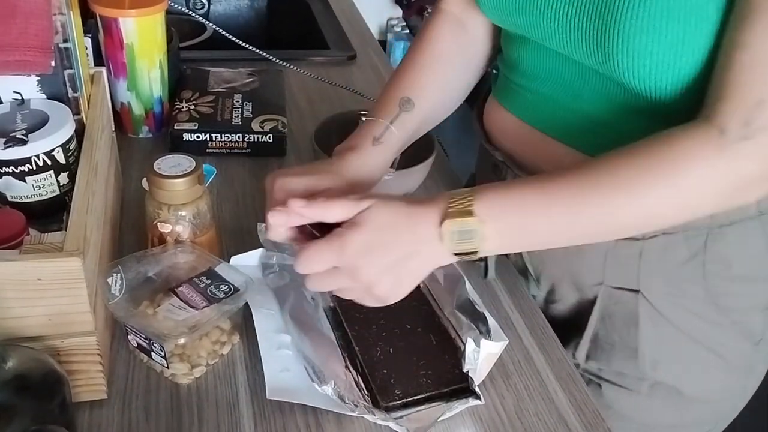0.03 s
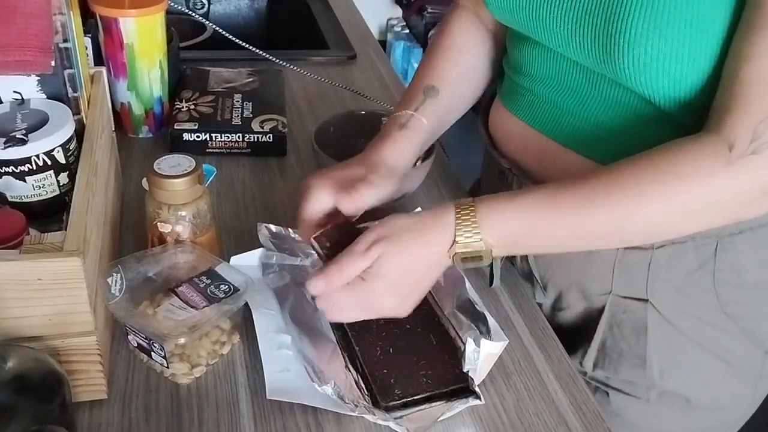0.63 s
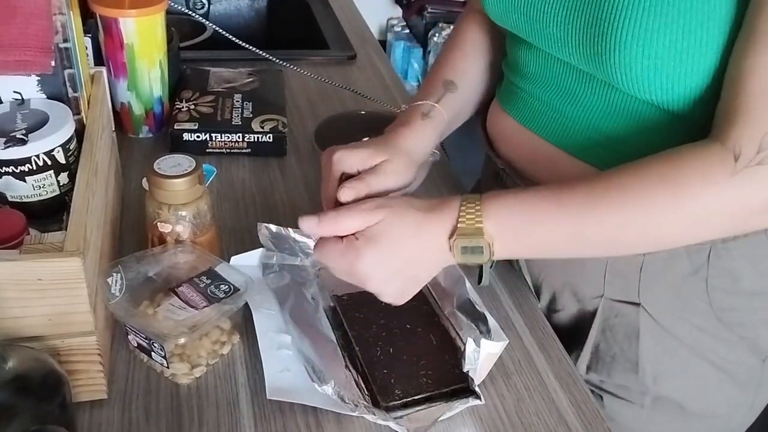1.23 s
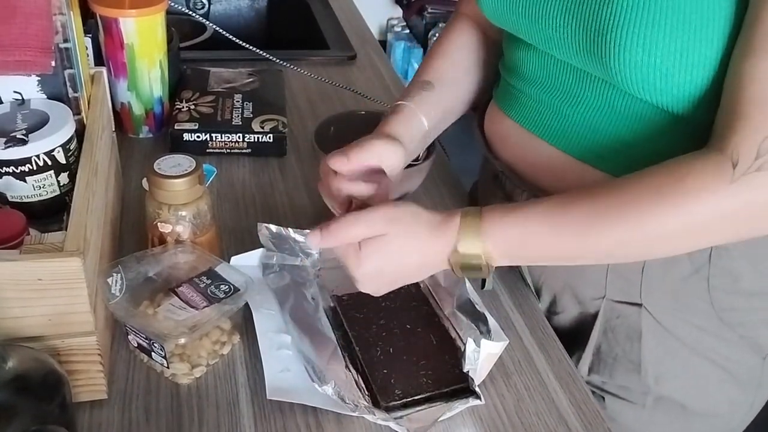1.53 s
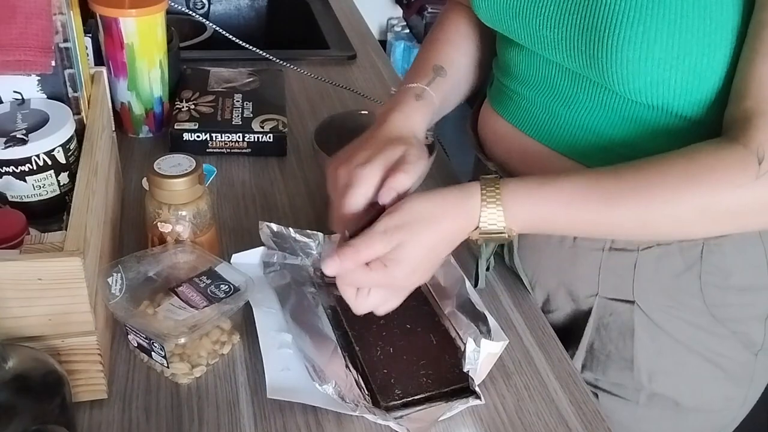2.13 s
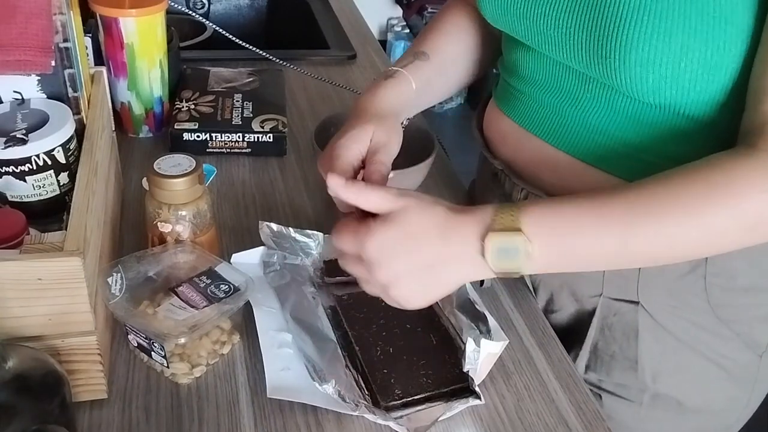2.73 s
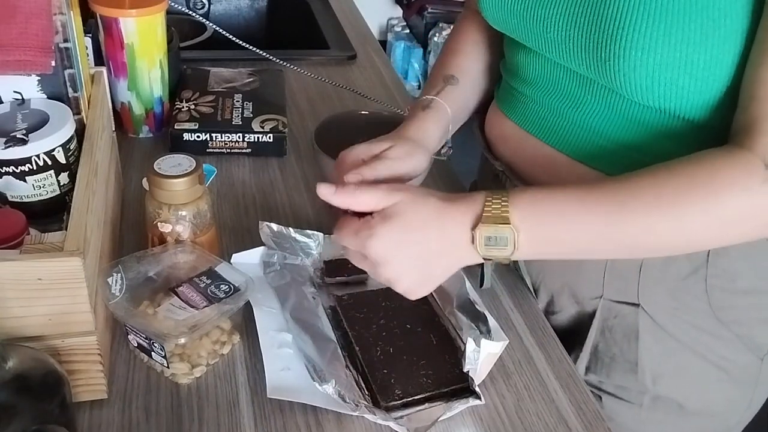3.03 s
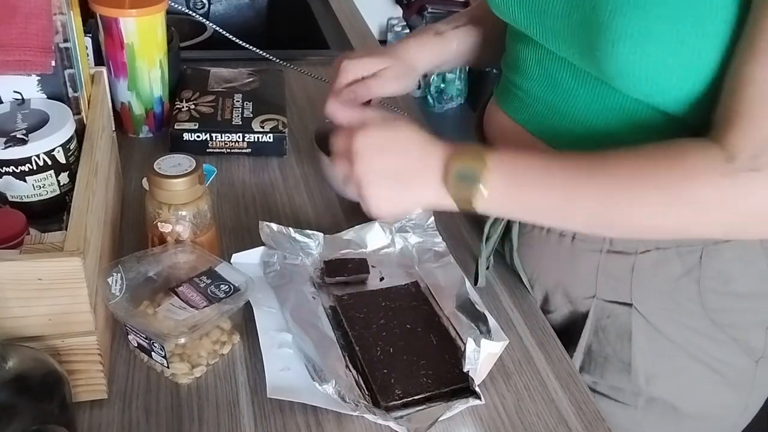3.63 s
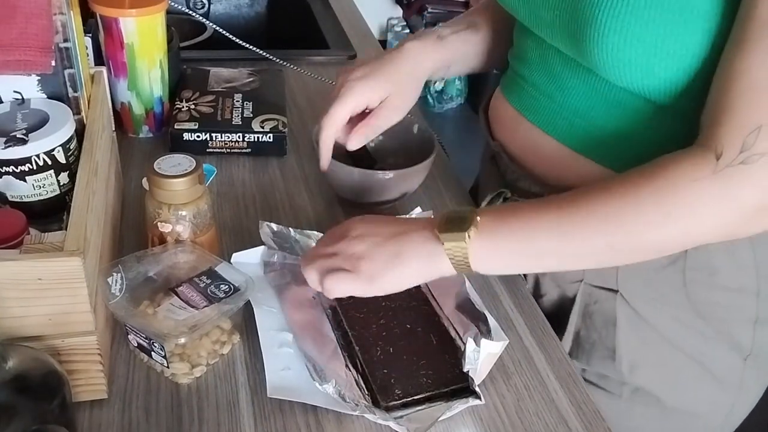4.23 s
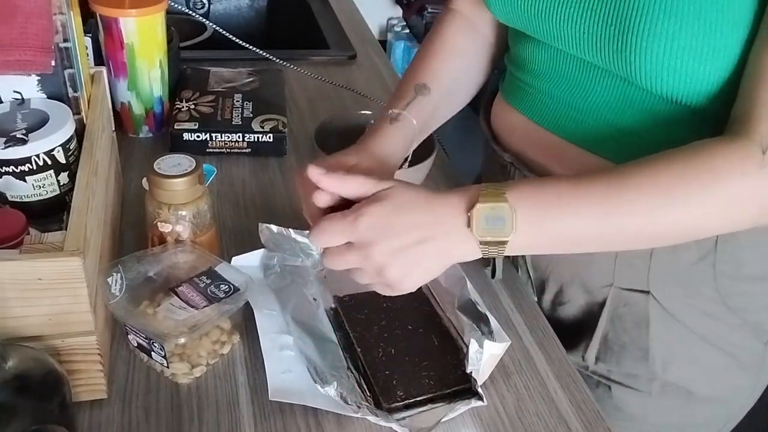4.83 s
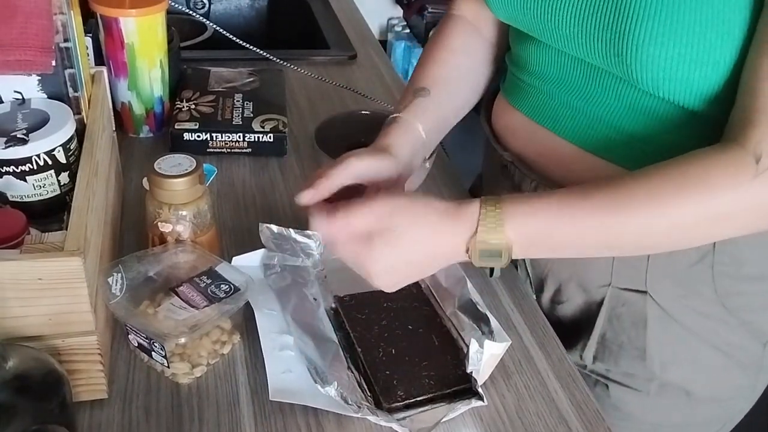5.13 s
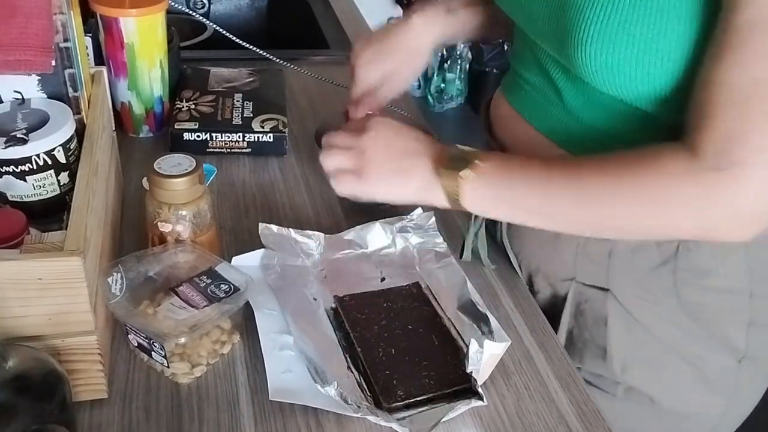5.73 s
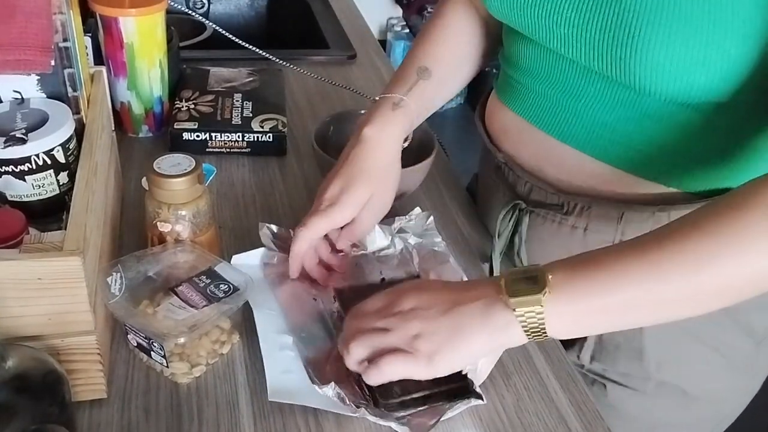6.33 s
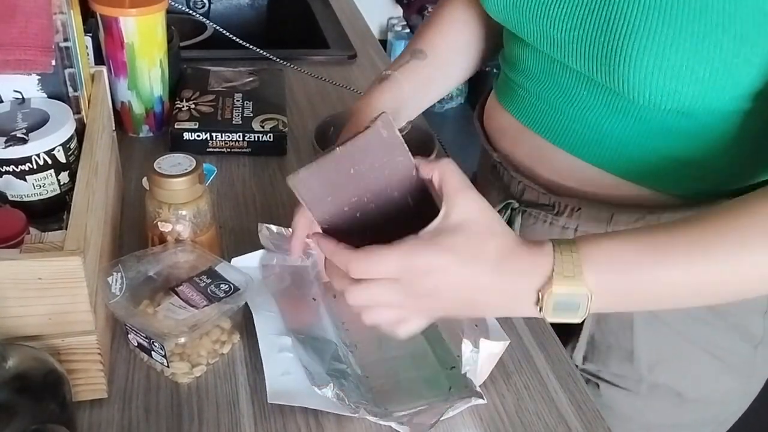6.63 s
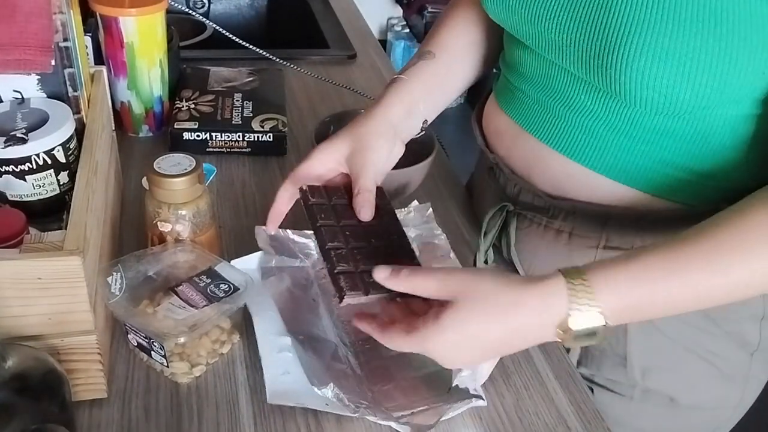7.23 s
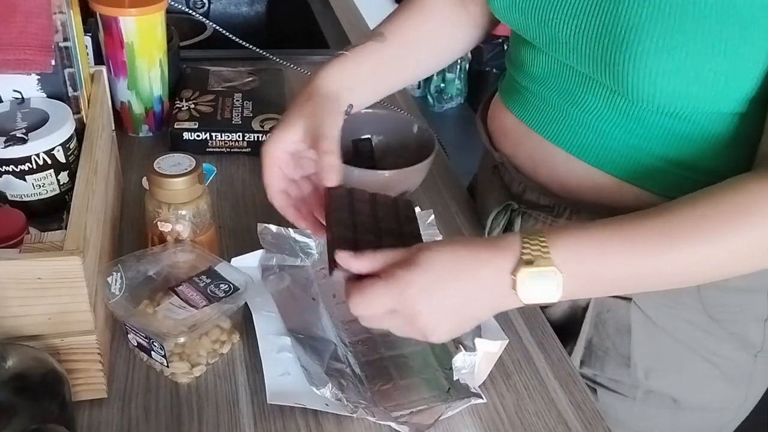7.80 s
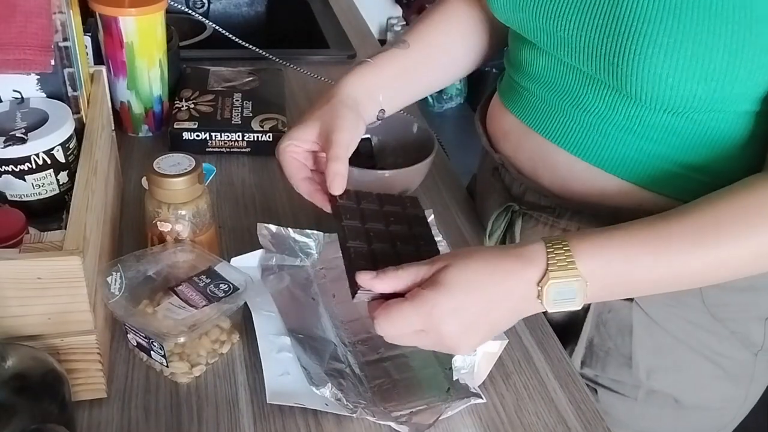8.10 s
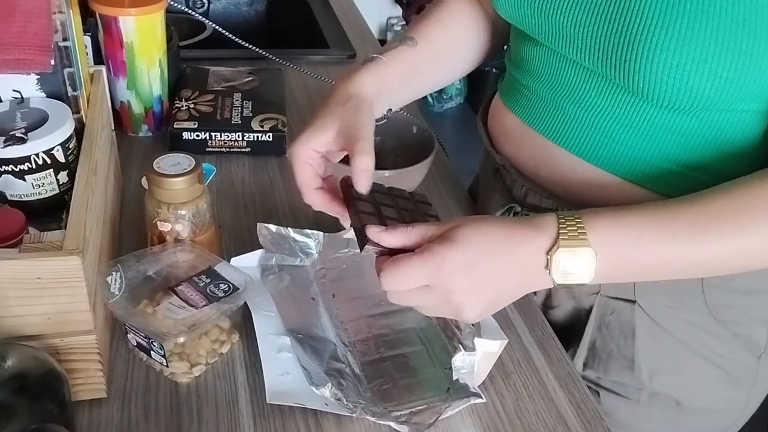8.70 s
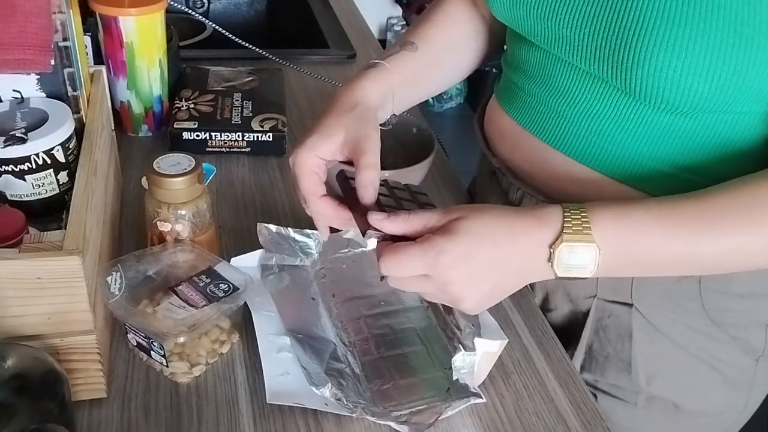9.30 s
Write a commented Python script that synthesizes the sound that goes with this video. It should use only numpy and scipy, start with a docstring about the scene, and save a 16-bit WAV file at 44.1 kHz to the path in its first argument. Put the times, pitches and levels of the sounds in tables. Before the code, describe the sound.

Hands crack chocolate and drop pieces into a ceramic bowl, with light foil rustles and dull knocks in a small kitchen.

```python
"""A chocolate bar cracks and crunches as hands break it over its open foil on a kitchen worktop.
Each crack, or click of a crumb, excites two resonances. Impacts of hands and pieces drive the low modes
of the worktop, and falling pieces ring a ceramic bowl. The foil crinkles by buckling; fingers and pieces
rub by stick-slip friction. A small live room reverberates, over faint air noise and an appliance's hum."""
import sys
import numpy as np
from scipy import signal
from scipy.fft import rfft, irfft
from scipy.io import wavfile

SR = 44100
rng = np.random.default_rng(int(sys.argv[2]) if len(sys.argv) > 2 else 0)


def file_out(sig):
    """Save sig as 16-bit WAV at sys.argv[1]."""
    # one column per channel
    cols = np.atleast_2d(sig).T
    # limit, then scale
    lim = np.clip(cols, -1, 1)
    pcm = np.round(lim * 32767).astype(np.int16)
    wavfile.write(sys.argv[1], SR, pcm)


N = 417186
TIME = np.arange(N) / SR
AGE = TIME[:SR // 2]  # time since an impact
TOP_HZ = 16100


# A piece cracks or crunches, or a crumb clicks as it lands:
# t/s, level/dB, main resonance f/Hz, its gain/dB, second resonance f/Hz, upper cutoff f/Hz
CRACKS_AND_CLICKS = [(.1915, -9.5, 694, 13.5, 1950, 1215), (1.5812, -11, 1783, 6.5, 5300, 6850),
                     (1.8986, -18.5, 470, 24, 850, 5000), (1.915, -15, 465, 13, 1420, 3500),
                     (2.0587, -14, 2500, 7, 860, 5000), (2.1095, -21.5, 2500, -8, 3400, 6500),
                     (2.599, -33, 480, 25.5, 1157, 1450), (3.2962, -19.5, 1684, 12, 2230, 5800),
                     (3.471, -26, 700, 10.5, 450, 800), (4.009, -28, 780, 13, 530, 1470),
                     (5.2187, -20.5, 2175, 8.5, 1370, 7200), (5.821, -29, 4060, -6, 6100, 7000)]


def cracks_and_clicks(width_hz=45, damping=0.068, second_db=4, low_hz=190, cycles=13, longest_s=0.0075):
    """Transient excitation: a crack or click rings two resonances; the slower the burst, the duller."""
    out = np.zeros(N)
    for s, db, main_hz, main_db, second_hz, cutoff_hz in CRACKS_AND_CLICKS:
        rise_s = min(cycles / cutoff_hz, longest_s)
        pulse = bandpass(burst(rise_s), low_hz, cutoff_hz)
        main, second = (resonance(pulse, hz, width_hz + damping * hz) for hz in (main_hz, second_hz))
        add(out, s, amp(db) * peak(pulse + amp(main_db) * main + amp(second_db) * second))
    return out


# Impacts on the worktop: t/s, level/dB, relative clack level/dB
WORKTOP_IMPACTS = [(0.778, -33.5, -16), (0.961, -33, -18.5), (1.849, -33, -31), (2.099, -22, -38),
                   (2.198, -31, -24), (2.751, -38.5, -10), (3.007, -26, -17.5), (3.218, -29, -20),
                   (3.318, -25.5, -20.5), (3.41, -32, -21), (3.501, -27, -9.5), (4.005, -24, -10),
                   (4.145, -30, -36), (4.225, -13.5, -15.5), (5.147, -44.5, -13.5), (5.508, -35, -31),
                   (8.013, -19, -18.5), (8.298, -40.5, -23.5), (8.485, -37, -23.5), (8.972, -32.5, -26),
                   (9.192, -43, -26)]
# Modes of the worktop: f/Hz, level/dB, T60/s
WORKTOP_MODES = [(46.4, -2.5, 0.21), (118.7, -11, 0.043), (145.54, 9, 0.24), (173, 6.5, 0.15),
                 (187.6, -4, 0.22), (244.3, -2.5, 0.096)]
# Spectrum of the contact: f/Hz, level/dB
CLACK_SPECTRUM = [(150, -15), (400, 0.5), (700, -8), (1100, -20.5), (2500, -31), (6000, -39), (15000, -40)]


def worktop_thuds(rise_s=0.0056, clack_s=0.0044, clack_db=-2):
    """Impact excitation: a soft blow sets the worktop's modes booming, and the contact radiates a clack."""
    booms, clacks = np.zeros(N), np.zeros(N)
    for s, db, contact_db in WORKTOP_IMPACTS:
        add(booms, s, -amp(db) * ring(WORKTOP_MODES, rise_s))
        clack = peak(colour(burst(clack_s), CLACK_SPECTRUM))
        add(clacks, s, amp(db + contact_db + clack_db) * clack)
    return booms, clacks


# Pieces landing in the bowl: t/s, level/dB, contact cutoff f/Hz
BOWL_IMPACTS = [(3.855, -30.5, 1510), (3.8981, -5.5, 10110), (5.715, -20.5, 1320), (5.7759, -20, 1630)]
# Modes of the bowl on the worktop: f/Hz, level/dB, T60/s
BOWL_MODES = [(155.3, -10, 0.21), (210, -7, 0.11), (411.3, -7, .06), (467.6, -2, 0.096), (672, 1, 0.03),
              (912, -14.5, 0.1002), (968, -2.5, 0.029), (1323, -14, 0.032), (2114, -17.5, .05),
              (3640, -24.5, 0.068), (5450, -20.5, .04), (6687, 3, 0.059), (6763, -7, 0.17),
              (6720, -12, 0.11), (7270, 1, .03), (7620, -22, 0.1), (8180, -15, 0.046), (9220, -6.5, 0.11),
              (10000, -15, 0.046)]


def bowl_clinks(chatter_s=.0025, chatter_db=-8, rise_s=0.000707, leak_db=-33):
    """Contact compliance is a low-pass: only a hard landing strongly excites the ceramic's high ping."""
    out = np.zeros(N)
    chatter_spectrum = [(900, 0), (2500, -6), (5000, -8), (7000, 0), (10000, -4)]  # f/Hz, level/dB
    for s, db, cutoff_hz in BOWL_IMPACTS:
        chatter = peak(colour(burst(chatter_s), chatter_spectrum))
        blow = ring(BOWL_MODES, rise_s) + amp(chatter_db) * chatter
        contact = signal.butter(5, cutoff_hz, fs=SR, output="sos")
        add(out, s, amp(db) * peak(signal.sosfilt(contact, blow) + amp(leak_db) * blow))
    return out


# A hand flexes the foil: onset t/s, hold/s, level/dB
FOIL_FLEXES = [(1.65, .11, -67), (1.97, 0.16, -50.5), (4.155, 0.31, -56.5), (4.38, 0.11, -57.5),
               (6.1, 0.12, -49), (6.175, 0.12, -50.5), (6.35, 0.34, -53.5), (6.9, .19, -53),
               (7.14, 0.12, -60), (7.26, 0.17, -55.5)]


def flex_envelope(attack_s=.02, release_s=0.034, sag_db_per_s=26):
    """Relaxation: the crackle of each flex starts quickly, eases as the sheet gives, then dies away."""
    gain = np.zeros(N)
    for s, hold_s, db in FOIL_FLEXES:
        age = np.maximum(TIME - s, 0)
        attack = np.minimum(age / attack_s, 1)
        release = np.exp(-np.maximum(age - hold_s, 0) / release_s)
        gain = np.maximum(gain, amp(db - sag_db_per_s * age) * attack * release)
    return gain


# Whole creases snapping through: t/s, level/dB
CREASE_SNAPS = [(0.0517, -51.5), (0.1037, -42), (0.714, -42.5), (0.9642, -42.5), (1.051, -34.5),
                (1.5798, -28.5), (1.855, -42.5), (1.9022, -24.5), (2.058, -28), (2.6508, -36), (3.49, -46),
                (3.8098, -41), (4.193, -45), (4.392, -37.5), (5.218, -40.5), (5.526, -42), (5.6255, -48),
                (6.0955, -34), (6.3015, -24), (6.599, -46), (6.8638, -42), (7.039, -39), (7.3948, -33),
                (7.7157, -51.5), (7.7607, -50.5)]
# Spectrum radiated by the foil: f/Hz, level/dB
FOIL_SPECTRUM = [(400, -13.5), (1000, -17), (2000, -11.5), (4500, -6), (6500, -4.5), (8500, -8.5),
                 (11000, -7), (13000, -1.5), (16000, -3)]


def foil_crinkle(pops_per_s=900, pop_s=.0012, crease_s=.0022, crumple_db=2, crease_db=2):
    """Buckling: facets of the flexed sheet pop with a tick and a ping; at times a whole crease flips."""
    starts = np.flatnonzero(rng.random(N - SR // 100) < pops_per_s / SR)
    age = AGE[:SR // 200]
    ping_hz = rng.uniform(1200, TOP_HZ, (len(starts), 1))
    ticks = rng.standard_normal((len(starts), len(age)))
    pops = (ticks + np.sin(2 * np.pi * ping_hz * age)) * np.exp(-age / pop_s)
    sizes = amp(5 * np.minimum(rng.exponential(size=(len(starts), 1)), 4))  # most are tiny, a few stand out
    samples = starts[:, None] + np.arange(len(age))
    crinkle = np.bincount(samples.ravel(), (sizes * pops).ravel(), N)
    clumps = amp(4 * wander(80))
    out = unit(colour(crinkle * clumps, FOIL_SPECTRUM)) * flex_envelope() * amp(crumple_db)
    for s, db in CREASE_SNAPS:
        add(out, s, amp(db + crease_db) * peak(colour(burst(crease_s), FOIL_SPECTRUM)))
    return out


# Fingertips brushing the bar: centre t/s, duration/s, level/dB
FINGER_STROKES = [(0.872, .38, -69), (1.5, 0.4, -71.5), (2.572, 0.5, -71), (3.009, 0.17, -58)]
# A hand or piece dragging, from rumble to squeak: centre t/s, duration/s, level/dB, judder f/Hz
JUDDERS = [(0.211, 0.1, -39, 137.7), (3.24, 0.067, -46, 400), (3.473, 0.45, -39, 46.5),
           (3.538, 0.073, -49.5, 611), (4.851, 0.059, -54, 362), (7.372, 0.064, -61, 1110),
           (7.495, 0.035, -66, 1120), (8.41, 0.22, -72.5, 2900)]


def rubbing(flicker_db=4.0, brush_band_hz=(1400, 7000), judder_ratio=1.22):
    """Stick-slip friction: uneven noise swells and fades, broadband in a brush, narrowband in a judder."""
    out = np.zeros(N)
    slips = rng.standard_normal(N) * amp(flicker_db * wander(70))
    rubs = [(*row, *brush_band_hz) for row in FINGER_STROKES]
    rubs += [(s, length, db, hz / judder_ratio, hz * judder_ratio) for s, length, db, hz in JUDDERS]
    for s, length, db, low_hz, high_hz in rubs:
        swell = np.cos(np.pi * np.clip((TIME - s) / length, -.5, .5))
        out += amp(db) * swell * unit(bandpass(slips, low_hz, high_hz))
    return out


# Spectrum of the room air: f/Hz, level/dB
AIR_SPECTRUM = [(25, -3.5), (45, -2), (110, -3.5), (200, -16.5), (350, -26), (600, -33), (1400, -43.5),
                (5000, -44.5), (10500, -53.5), (14000, -50.5)]


def room_air(db=-50):
    """Spatial coherence: ambient noise is nearly alike at both microphones in the bass, unlike above it."""
    mid, side = (unit(colour(rng.standard_normal(N), AIR_SPECTRUM)) for _ in range(2))
    side = colour(side, [(100, -13.5), (300, -8.0), (1000, 0.5)])
    return amp(db) * np.array([mid + side, mid - side])


# Partials of the appliance: f/Hz, level/dB
HUM_PARTIALS = [(42, -62.5), (81, -62), (286.5, -62.5)]


def appliance_hum():
    """Amplitude and phase modulation: each low partial wavers slightly at random."""
    return sum(np.sqrt(2) * amp(db + wander(7.6)) * np.sin(2 * np.pi * hz * TIME + wander(1.9) / 2)
               for hz, db in HUM_PARTIALS)


# Reverberation time of the kitchen: f/Hz, T60/s
KITCHEN_T60 = [(100, 0.65), (300, 0.67), (700, 0.5), (1900, 0.52), (5000, 0.55), (13000, 0.082)]


def room_response(build_s=0.0033, early_db=5, early_s=0.0056, low_hz=90):
    """Reverberation: strong early reflections lead into a diffuse tail that decays band by band."""
    t = TIME[:SR * 3 // 4]
    hz = np.fft.rfftfreq(len(t), 1 / SR)
    centres = np.geomspace(100, 15000, 9)
    noise = rfft(rng.standard_normal(len(t))) * hz ** 2 / (hz ** 2 + low_hz ** 2)  # small room: no deep bass
    tail = 0
    for centre, weights in zip(centres, np.eye(len(centres))):
        band = irfft(noise * curve_at(np.c_[centres, weights], hz), len(t))
        tail = tail + band * np.exp(-np.log(1000) * t / curve_at(KITCHEN_T60, centre))
    tail *= 1 - np.exp(-(t / build_s) ** 2)
    tail *= 1 + amp(early_db) * np.exp(-t / early_s)
    return tail / np.sqrt(np.sum(tail ** 2))


def amp(db):
    """Amplitude ratio of a level."""
    return 10 ** (np.asarray(db) / 20)


def unit(x):
    """Normalisation to unit rms."""
    return x / np.sqrt(np.mean(x ** 2))


def peak(x):
    """Normalisation to unit peak."""
    return x / np.abs(x).max()


def add(track, s, sound):
    """Superposition of a sound on a track at s seconds."""
    start = int(s * SR)
    track[start:start + len(sound)] += sound[:N - start]


def wander(rate_hz):
    """Random modulation of unit rms, by linear interpolation."""
    knots = rng.standard_normal(int(rate_hz * N / SR) + 2)
    return unit(np.interp(TIME * rate_hz, np.arange(len(knots)), knots))


def curve_at(points, hz):
    """Interpolation of (f/Hz, value) points on a log-frequency axis."""
    f, value = np.transpose(points)
    return np.interp(np.log(hz + 1), np.log(f), value)


def colour(x, points, size=8192):
    """Minimum-phase filtering to a (f/Hz, level/dB) curve, by folding its cepstrum."""
    gain = amp(curve_at(points, np.fft.rfftfreq(size, 1 / SR)))
    cepstrum = irfft(np.log(gain))
    cepstrum[1:size // 2] *= 2
    cepstrum[size // 2 + 1:] = 0
    return signal.fftconvolve(x, irfft(np.exp(rfft(cepstrum))))[:len(x)]


def bandpass(x, low_hz, high_hz):
    """Band limiting between two cutoffs."""
    return signal.sosfilt(signal.butter(2, [low_hz, high_hz], "bandpass", fs=SR, output="sos"), x)


def resonance(x, hz, width_hz):
    """Forced response of a resonator with unit gain at its centre."""
    return signal.lfilter(*signal.iirpeak(hz, hz / width_hz, fs=SR), x)


def burst(rise_s):
    """Broadband transient: noise swells and dies, its spectrum whitened."""
    envelope = AGE / rise_s * np.exp(-AGE / rise_s)
    x = rng.standard_normal(len(AGE)) * envelope
    for _ in range(2):
        white = irfft(np.exp(1j * np.angle(rfft(x))), len(AGE))
        x = white * np.sqrt(envelope)
    return x


def ring(modes, rise_s):
    """Free vibration of damped modes; each blow lands elsewhere and weights them a little differently."""
    hz, db, t60 = np.transpose(modes)[:, :, None]
    gain = amp(db + rng.standard_normal(hz.shape))
    partials = gain * np.sin(2 * np.pi * hz * AGE) * np.exp(-np.log(1000) * AGE / t60)
    return peak(partials.sum(axis=0) * (1 - np.exp(-AGE / rise_s)))


def place(x, room, db, wet_db, pan_db, lag_ms):
    """Direct plus reverberant field; positive pan favours the left, positive lag delays the right."""
    size = 2 ** 19
    delay = np.exp(-2j * np.pi * np.fft.rfftfreq(size, 1 / SR) * lag_ms / 1000)
    delayed = irfft(rfft(x, size) * delay)[:N]
    direct = np.array([x * amp(pan_db / 2), delayed * amp(-pan_db / 2)])
    reverberant = np.array([signal.oaconvolve(x, side)[:N] for side in room])
    return amp(db) * (direct + amp(wet_db) * reverberant)


def scene():
    """Superposition of all sources in one kitchen."""
    room = [room_response(), room_response()]
    booms, clacks = worktop_thuds()
    return (place(cracks_and_clicks(), room, db=-1.5, wet_db=-3.0, pan_db=-1.5, lag_ms=0.046)
            + place(booms, room, db=3, wet_db=-13.0, pan_db=1.5, lag_ms=-0.13)
            + place(clacks, room, db=12.5, wet_db=2.0, pan_db=-3.0, lag_ms=-0.22)
            + place(bowl_clinks(), room, db=0.0, wet_db=-1.5, pan_db=1.0, lag_ms=0.013)
            + place(foil_crinkle(), room, db=4.5, wet_db=2, pan_db=4.5, lag_ms=0.021)
            + place(rubbing(), room, db=3.5, wet_db=-3, pan_db=.5, lag_ms=-0.042)
            + room_air() + appliance_hum())


# Response of the left microphone port: f/Hz, level/dB
LEFT_RESPONSE = [(300, 3), (650, 0.5), (1200, 1.5), (6500, -5), (8200, -8), (13000, 3)]
# Response of the right microphone port: f/Hz, level/dB
RIGHT_RESPONSE = [(1200, 2.5), (8200, -4), (11200, -2), (13000, -2)]


def record(dry):
    """Frequency response: each microphone port colours its channel, and a steep low-pass cuts the top."""
    ports = np.array([colour(dry[0], LEFT_RESPONSE), colour(dry[1], RIGHT_RESPONSE)])
    return signal.sosfilt(signal.ellip(10, .2, 70, TOP_HZ, fs=SR, output="sos"), ports)


dry = scene()
out = record(dry)
file_out(out)
```